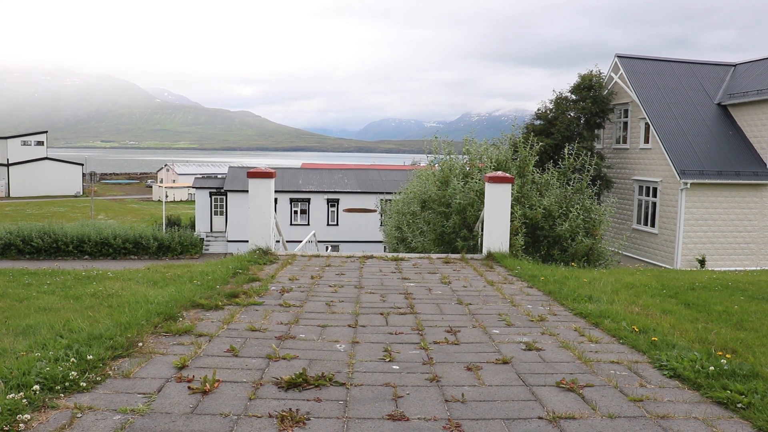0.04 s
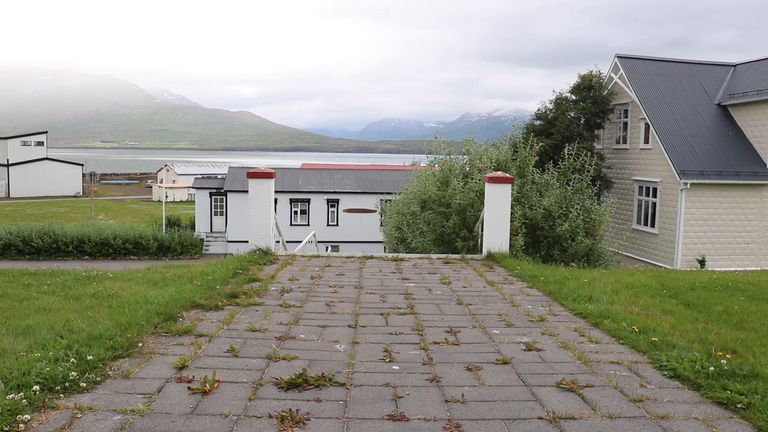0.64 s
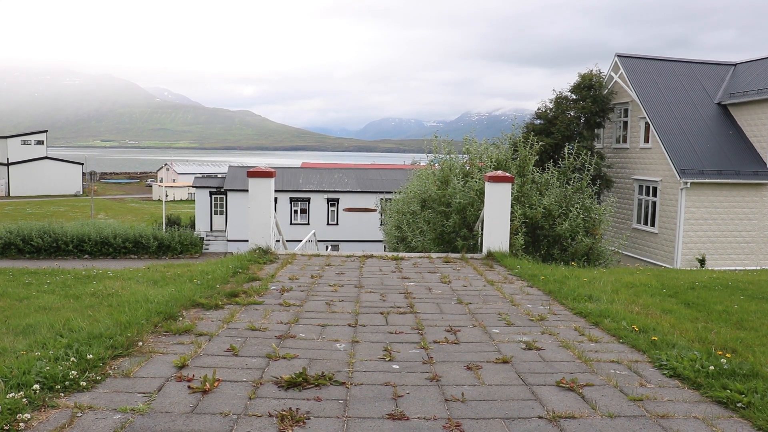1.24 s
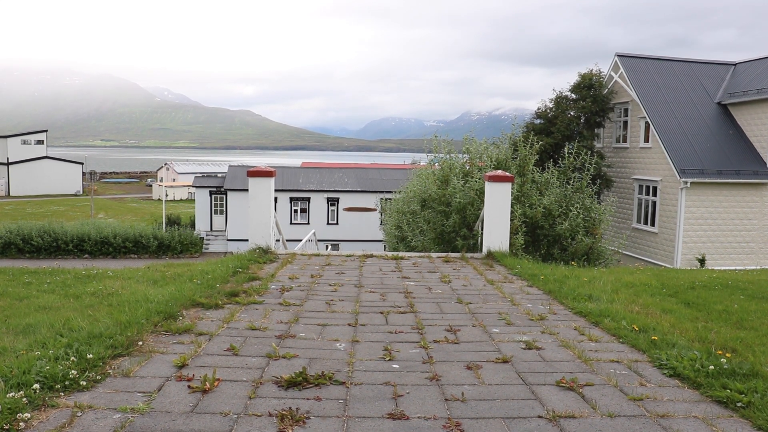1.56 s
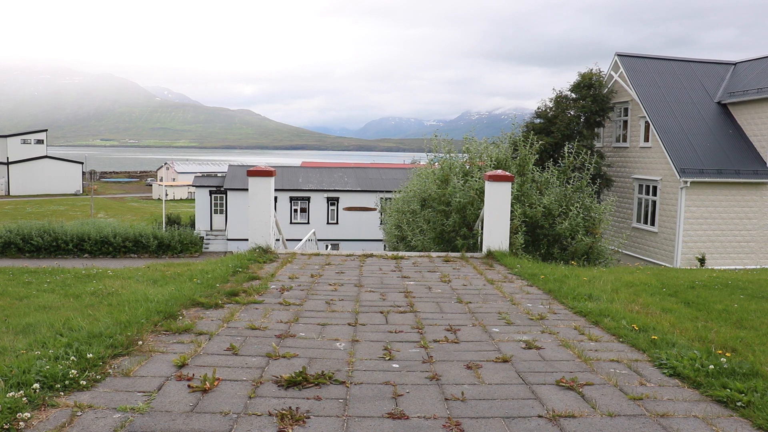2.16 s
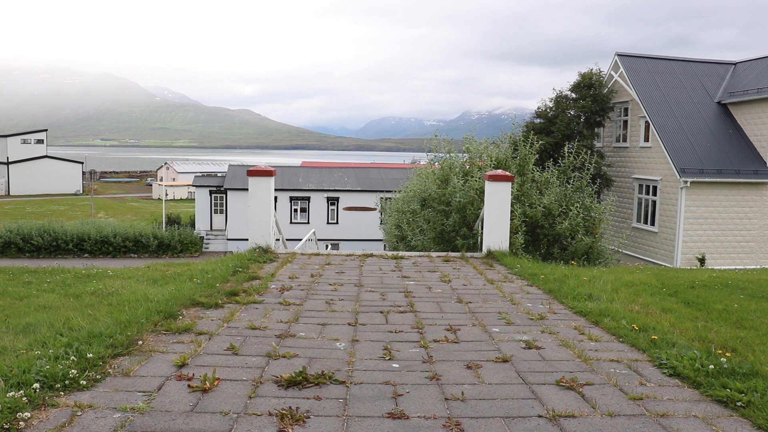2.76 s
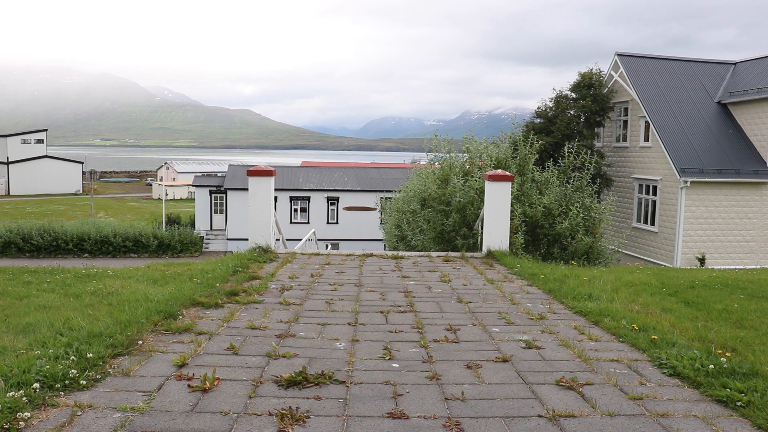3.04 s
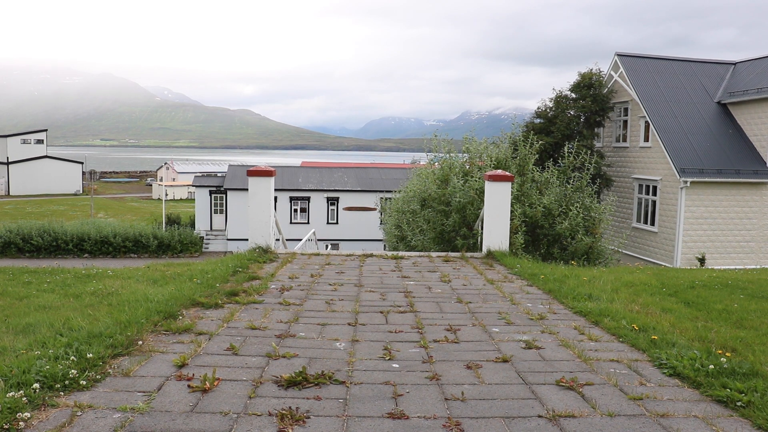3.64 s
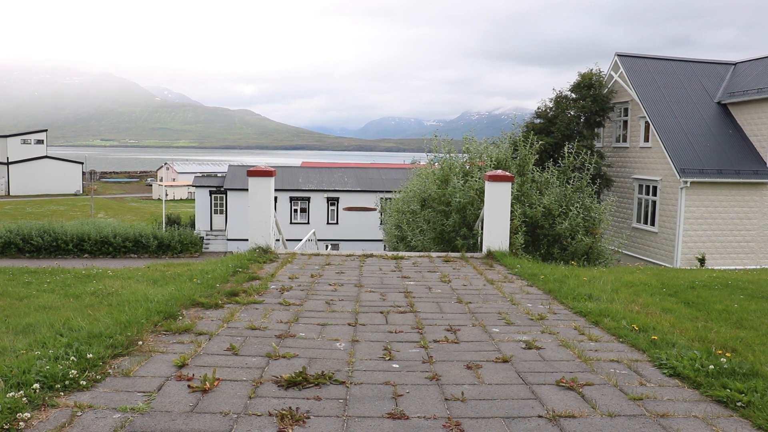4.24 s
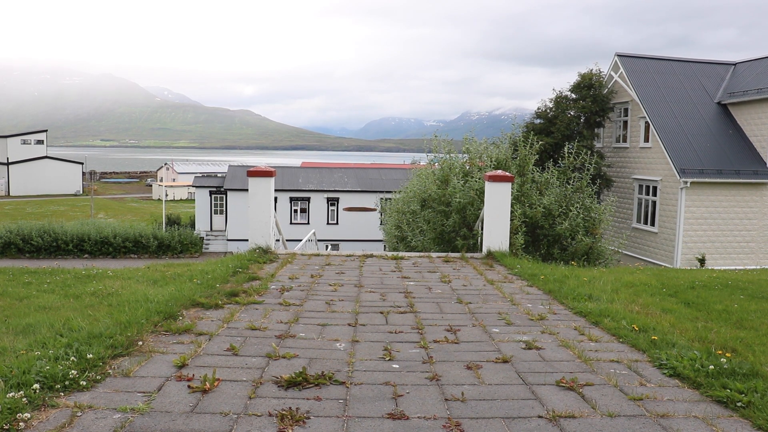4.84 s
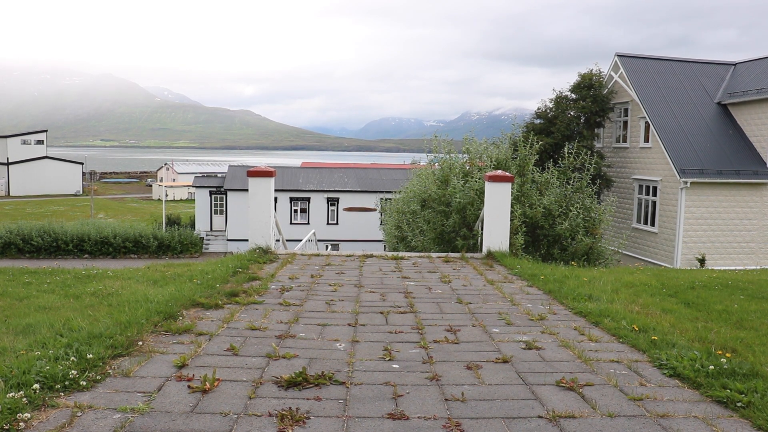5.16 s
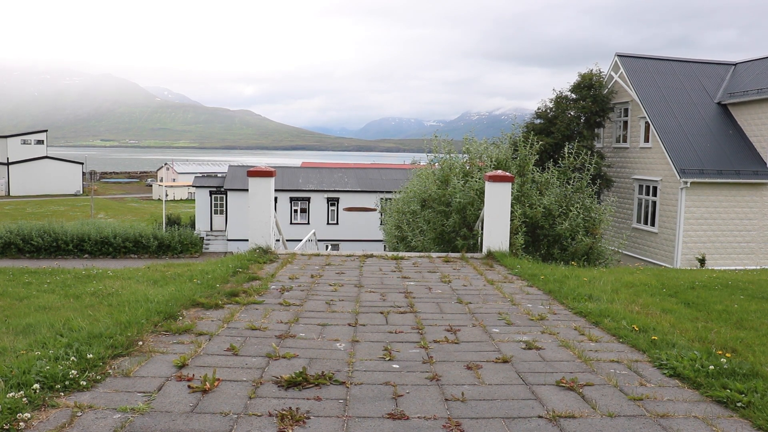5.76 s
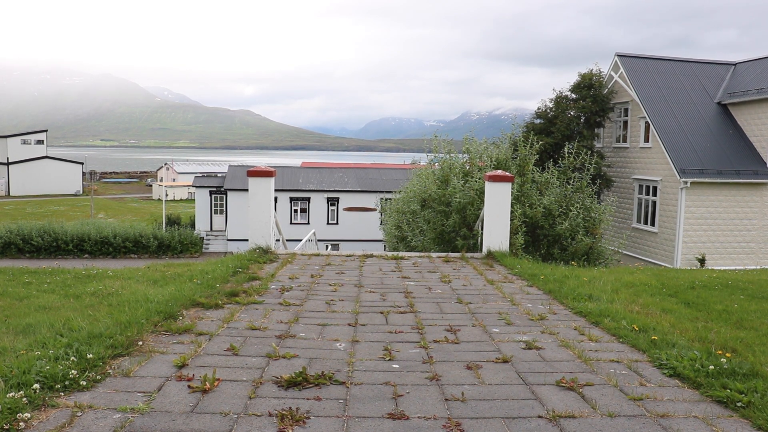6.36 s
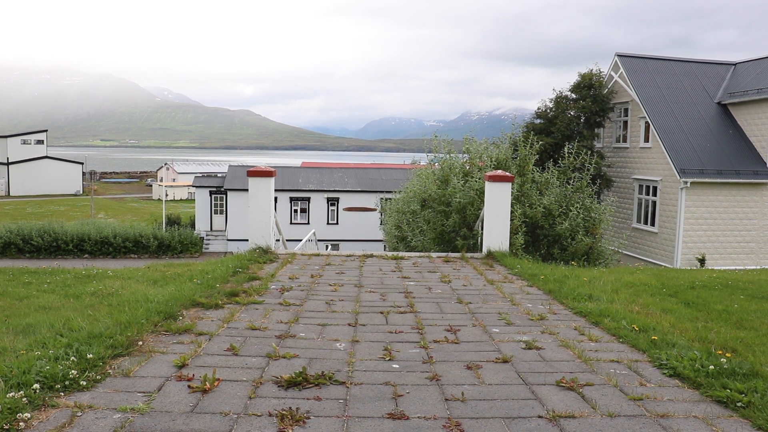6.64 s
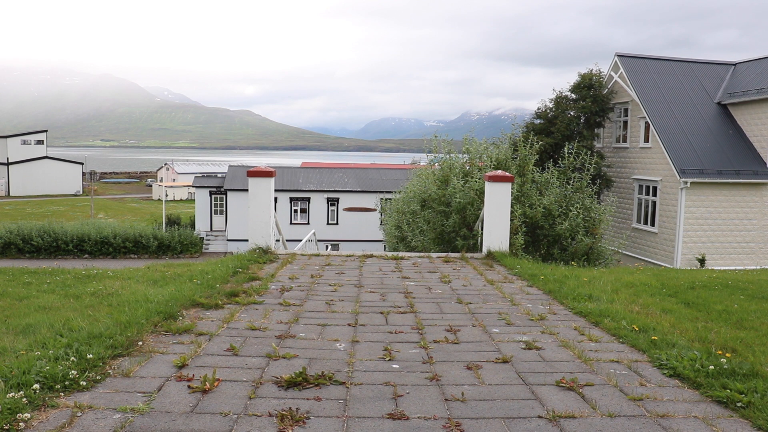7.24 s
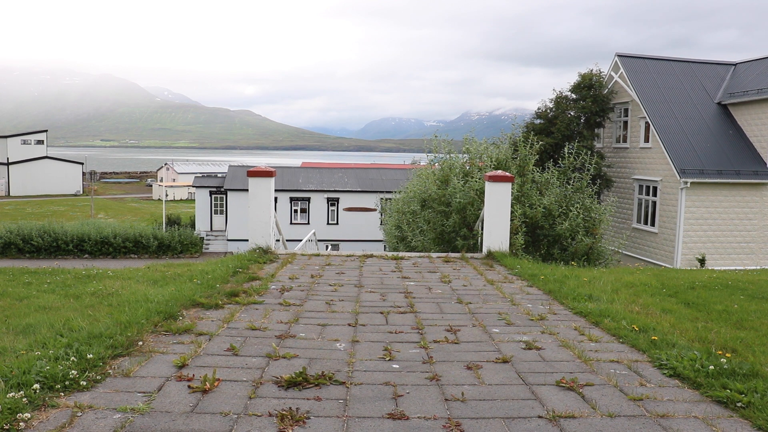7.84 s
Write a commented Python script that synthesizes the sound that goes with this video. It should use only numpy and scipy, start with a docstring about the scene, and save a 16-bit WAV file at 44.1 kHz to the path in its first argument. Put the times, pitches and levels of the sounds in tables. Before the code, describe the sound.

A single church bell rings outdoors, striking right at the start and swinging on in uneven pairs of blows. Each one is a sharp, bright clang with a soft thud beneath it, echoing in the belfry and leaving a long, wavering ring. On the last swing the clapper bounces and hits twice in quick succession. Faint wind rumble, hiss and a low hum lie behind it.

```python
"""A church bell rings out at once and swings on in uneven pairs of blows; on the last swing the clapper
bounces and hits twice. Each impact excites the bell's partials, close pairs that beat, and two short pings
bloom just after it. A clang reverberates in the belfry, and the jolted frame resonates with a thud.
Behind the bell lie a faint rumble of wind, a steady hiss and a low hum."""
import sys
import numpy as np
from scipy import signal
from scipy.fft import rfft, irfft, next_fast_len
from scipy.io import wavfile
from scipy.ndimage import map_coordinates

SR = 44100
rng = np.random.default_rng(int(sys.argv[2]) if len(sys.argv) > 2 else 0)


def inscribe(sig):
    """Save sig as 16-bit PCM at rate SR to the path in sys.argv[1].

    A 1-D sig is mono; a 2-D sig holds one channel per row.
    Samples are clipped to [-1, 1] before scaling.
    """
    pcm = np.round(np.clip(np.atleast_2d(sig).T, -1, 1) * 32767)
    wavfile.write(sys.argv[1], SR, pcm.astype(np.int16))


N = 352359

# Partials of the bell, plus two short pings (1457 and 2230 Hz) that bloom just after each blow;
# the spot struck (0-2) sets each level and the signed share of its twin:
# pitch_hz, spot0_db, spot1_db, spot2_db, twin0_ratio, twin1_ratio, twin2_ratio,
# t60_s, rise_s, beat_hz, dip_s (a beat minimum for a positive twin, a maximum for a negative one)
BELL_TONES = [(339, -46, -40, -51, 0.12, 0.12, 0.12, 9.7, 0.025, 1.53, 0.27),
              (444, -38.5, -42, -34, 0.68, -0.6, 0.55, 11.48, 0.025, 1.52, 0.07),
              (706.7, -28.5, -29, -32, 0.05, 0.05, 0.05, 12.0, 0.03, 1.39, 0.13),
              (856.8, -27, -26, -26, 0.12, 0.12, 0.12, 9.89, 0.025, 0.95, 0.03),
              (899, -28, -26, -28, 0.22, 0.25, 0.6, 7.48, 0.053, 3.53, 0.16),
              (1014, -35, -32, -32, 0.07, 0.07, 0.07, 7.29, 0.05, 0.9, 0.25),
              (1120.2, -22, -24, -22, 0.88, 0.85, -0.15, 5.51, 0.025, 1.47, 0.02),
              (1358, -37, -36, -39, 0.69, 0.85, 0.9, 3.25, 0.082, 1.81, 0.39),
              (1457, -9.5, -9.5, -20, 0, 0, 0, 0.25, 0.038, 1, 0),
              (1461, -24, -24, -24, 0.33, 0.4, -0.75, 3.69, 0.035, 4.35, 0.17),
              (1746, -30, -25, -35, 0.57, 0.5, -0.45, 2.06, 0.029, 3.97, 0.17),
              (1787, -22, -29, -37, 0.71, 0.71, 0.71, 0.64, 0.054, 5.1, 0.0),
              (1890, -19, -22, -29, 0.17, 0.3, -0.15, 1.7, 0.1, 4.42, 0.05),
              (1927.4, -11, -11, -13.5, 0.24, 0.2, 0.55, 1.72, 0.141, 1.4, 0.57),
              (2071, -16, -18, -33, 0.25, 0.25, 0.25, 0.58, 0.13, 4.73, 0.01),
              (2209, -21.5, -21.5, -25, 0.27, 0.15, 0.25, 2.9, 0.081, 2.23, 0.24),
              (2230, -15, -15, -20, 0, 0, 0, 0.35, 0.08, 1, 0),
              (2380, -14, -15, -13, 0.09, 0.09, 0.09, 0.81, 0.141, 4.6, 0.01),
              (2618, -27, -30, -28, 0.47, 0.47, 0.47, 0.66, 0.048, 2.92, 0.16),
              (2795, -24, -26, -23, 0.71, 0.71, 0.71, 0.57, 0.049, 0.9, 0.33),
              (2839, -36, -34, -34, 0.77, 0.77, 0.77, 1.31, 0.043, 6.18, 0.16),
              (2919.5, -28, -34, -23, 0.18, 0.45, 0.1, 2.6, 0.056, 9.27, 0.09),
              (3005, -16, -18, -17, 0.84, 0.84, 0.84, 0.64, 0.102, 1.08, 0.09),
              (3038, -19, -18, -24, 0.14, 0.14, 0.14, 1.33, 0.094, 0.9, 0.36),
              (3067.5, -30, -20, -31, 0.27, 0.5, 0.55, 2.38, 0.041, 1.39, 0.59),
              (3164, -34, -32, -37, 0.54, 0.85, 0.55, 1.55, 0.07, 2.42, 0.27),
              (3407, -51, -45, -46, 0.32, 0.32, 0.32, 1.81, 0.054, 3.6, 0.27),
              (3520, -38, -36, -34, 0.76, 0.76, 0.76, 0.83, 0.025, 0.9, 0.1),
              (3624, -28, -26, -32, 0.15, 0.15, 0.15, 0.71, 0.022, 2.92, 0.15),
              (3823, -40, -34, -48, 0.32, 0.32, 0.32, 1.4, 0.085, 2.66, 0.05),
              (4019, -32, -21, -31, 0.55, 0.15, 0.6, 2.13, 0.025, 3.42, 0.08),
              (4052, -27, -35, -26, 0.09, -0.2, 0.3, 1.74, 0.053, 2.07, 0.37),
              (4183, -45, -45, -45, 0.3, 0.3, 0.3, 1.44, 0.069, 3.66, 0.24),
              (4280, -53, -53, -45, 0.19, 0.19, 0.19, 1.73, 0.044, 4.92, 0.03),
              (4624, -52, -45, -53, 0.44, 0.44, 0.44, 1.89, 0.029, 0.9, 0.43),
              (4725, -43, -42, -45, 0.44, 0.44, 0.44, 1.32, 0.067, 6.44, 0.1),
              (4877, -45, -46, -51, 0.08, 0.08, 0.08, 1.52, 0.088, 3.59, 0.11),
              (5041, -30, -25, -39, 0.35, 0.35, 0.35, 0.88, 0.022, 1.65, 0.45),
              (5295, -44, -42, -35, 0.14, 0.8, 0.55, 1.83, 0.04, 11.62, 0.01),
              (5529, -41, -37, -41, 0.22, 0.22, 0.22, 0.73, 0.054, 3.97, 0.1),
              (5852, -52, -47, -49, 0.55, 0.55, 0.55, 1.14, 0.099, 4.73, 0.13),
              (6108, -32, -37, -39, 0.27, 0.25, -0.3, 1.69, 0.022, 5.93, 0.14),
              (6632, -50, -44, -42, 0.2, 0.2, 0.2, 1.19, 0.04, 2.86, 0.35),
              (7222, -42, -39, -46, 0.7, 0.7, 0.5, 1.48, 0.052, 13.47, 0.0),
              (8010, -44, -43, -39, 0.19, 0.19, 0.19, 0.88, 0.068, 5.51, 0.08),
              (8355, -39, -35, -50, 0.3, 0.3, 0.2, 1.16, 0.102, 3.54, 0.1),
              (8972, -54, -48, -58, 0.66, 0.66, 0.66, 1.07, 0.056, 0.9, 0.48),
              (9502, -42, -38, -46, 0.35, 0.35, 0.35, 1.04, 0.055, 3.25, 0.1),
              (10175, -59, -47, -59, 0.41, 0.41, 0.41, 1.24, 0.03, 8.46, 0.1),
              (10621, -48, -47, -49, 0.17, 0.17, 0.17, 1.05, 0.065, 2.3, 0.26),
              (10909, -51, -52, -60, 0.48, 0.48, 0.48, 1.08, 0.074, 0.9, 0.54),
              (11775, -53, -42, -44, 0.63, 0.63, 0.63, 0.62, 0.087, 3.42, 0.15),
              (12518, -60, -48, -54, 0.69, 0.69, 0.69, 0.61, 0.081, 3.24, 0.11)]
# Impacts of the clapper: start_s, spot_index, ring_db, clang_db, thud_db
CLAPPER_BLOWS = [(-2.12, 0, -0.5, -20, -20), (-0.006, 1, -0.2, 0.5, 4), (1.493, 0, 0.3, 0.5, 3),
                 (3.615, 0, 0.2, 0, 1), (5.111, 0, 0, -0.5, 1), (6.993, 0, -0.7, -1.2, 5),
                 (7.108, 2, 0, -2.2, 2)]
# Direct sound relative to the reverberant ring, for spots 0-2: level_db
DIRECT_BY_SPOT = [-20, -20, -7]
# Spectral envelope of the weak high partials: pitch_hz, level_db
SHIMMER_SPECTRUM = [(1500, -46), (2200, -42), (3400, -49), (5000, -50), (8000, -58), (12000, -63),
                    (13500, -74)]
# Spectral shape of the clang: frequency_hz, relative_db
CLANG_SPECTRUM = [(120, -21), (300, -12), (520, -12), (750, -2), (1120, 0), (1350, -5), (1750, -1),
                  (2250, 0), (2550, -8), (2900, -2), (3400, -15), (5000, -19), (8000, -28), (15000, -49)]
# Decay times of the clang: frequency_hz, t60_s
CLANG_DECAY = [(200, .7), (1000, .36), (2000, .55), (3000, .58), (5000, .5), (13000, .38)]
# Resonances of the bell frame: centre_hz, width_hz, level_db, rise_s, t60_s
FRAME_MODES = [(68, 24, -40, .08, .8), (125, 35, -45, .05, .55), (198, 55, -38, .01, .22)]
# Steady background hiss, its top treble rolled off above about 11 kHz: frequency_hz, relative_db
HISS_SPECTRUM = [(10, -3), (25, 0), (60, -5), (130, -10), (250, -13), (500, -18), (1000, -25), (2000, -38),
                 (4000, -45), (10500, -46.5), (11800, -58), (15500, -68)]
# Spectral shape of the wind's rumble: frequency_hz, relative_db
WIND_SPECTRUM = [(8, -6), (25, 0), (55, -4), (120, -18), (400, -60), (1000, -120)]
# Tones of the distant hum: pitch_hz, rms_db
HUM_TONES = [(66, -60), (99, -58), (167, -64)]


def bell_ring(scatter_db=.5, handover_s=.025, flutter_db=1.1, drift_cycles=.045, settle_s=1.3):
    """Beating: each blow starts close pairs of partials and two pings; the clapper damps the old ring."""
    out = np.zeros(N)
    sway = (wobble(7) + .3 * wobble(50)).astype(np.float32)  # slow waver plus a quick shiver
    ends = [blow[0] for blow in CLAPPER_BLOWS[1:]] + [N / SR]
    for (start, spot, ring_db, _, _), end in zip(CLAPPER_BLOWS, ends):
        spot = round(spot)
        span = np.arange(int((end - start + .15) * SR), dtype=np.float32) / SR
        ring = np.zeros(len(span))
        unsettled = 1 + 1.2 * fade(span, settle_s)  # the first echoes interfere most
        for hz, db0, db1, db2, twin0, twin1, twin2, t60, rise, beat_hz, dip_s in BELL_TONES:
            db, twin = [(db0, twin0), (db1, twin1), (db2, twin2)][spot]
            t = span[:int(2 * t60 * SR)]
            # the swinging bell shifts its echoes, so level and phase waver, high partials most
            depth = (hz / 3000) ** .5  # scales flutter_db and drift_cycles
            level_sway, phase_sway = (depth * sway[k:k + len(t)] for k in rng.integers(N // 2, size=2))
            phase = 2 * np.pi * (hz * t + rng.random() + drift_cycles * phase_sway)
            pair = np.sin(phase) - twin * np.sin(phase + 2 * np.pi * beat_hz * (t - dip_s))
            flutter = flutter_db * unsettled[:len(t)] * level_sway
            gain = amp(db + scatter_db * rng.standard_normal() + flutter)
            ring[:len(t)] += gain * arrival(t, rise, DIRECT_BY_SPOT[spot]) * fade(t, t60) * pair
        damping = 1 - swell(np.maximum(span - (end - start), 0), handover_s)
        add(out, start, amp(ring_db) * ring * damping)
    return out


def bell_shimmer(count=110, low_hz=1700, high_hz=13200, t60_s=.85, rise_s=.045):
    """Superposition: many weak high partials merge into a shimmer that dies soon after each blow."""
    out, t = np.zeros(N), np.arange(SR) / SR
    pitches = low_hz + (high_hz - low_hz) * (np.arange(count) + rng.random(count)) / count
    waves = np.sin(2 * np.pi * (pitches[:, None] * t + rng.random((count, 1))))
    for start, _, _, clang_db, _ in CLAPPER_BLOWS:
        gains = amp(along(SHIMMER_SPECTRUM, pitches) + clang_db) * rng.standard_normal(count)
        add(out, start, gains @ waves * swell(t, rise_s) * fade(t, t60_s))
    return out


def clapper_clang(gain_db=-15, rise_s=.036, direct_db=-15):
    """Impact excitation: a broadband crash, crowded about the partials, reverberates in the belfry."""
    out, t = np.zeros(N), np.arange(SR) / SR
    colour = lambda hz: amp(along(CLANG_SPECTRUM, hz)) * near_tones(hz)
    envelope = arrival(t, rise_s, direct_db)
    for start, _, _, clang_db, _ in CLAPPER_BLOWS:
        add(out, start, amp(gain_db + clang_db) * envelope * burst(colour, CLANG_DECAY))
    return out


def frame_thud(lead_s=.016):
    """Damped resonance: the swing jolts the frame just before each blow; it knocks, then booms."""
    out, t = np.zeros(N), np.arange(SR) / SR
    for start, _, _, _, thud_db in CLAPPER_BLOWS:
        for centre_hz, width_hz, db, rise, t60 in FRAME_MODES:
            wood = noise(SR, lambda hz: resonance(hz - centre_hz, width_hz / 2))
            add(out, start - lead_s, amp(db + thud_db) * swell(t, rise) * fade(t, t60) * wood)
    return out


def background(hiss_db=-51, wind_db=-54.2, gust_db=1.2, eddy_db=2.4, waver_db=2.5, drift_cycles=.25):
    """Random modulation: slow gusts and quick eddies vary the wind over steady hiss; a far hum wavers."""
    wind_gain = amp(wind_db + gust_db * wobble(2.5) + eddy_db * wobble(7))
    wind = wind_gain * noise(N, lambda hz: amp(along(WIND_SPECTRUM, hz)))
    hum = np.zeros(N)
    for pitch_hz, db in HUM_TONES:
        peak = np.sqrt(2) * amp(db + waver_db * wobble(2))
        hum += peak * np.sin(2 * np.pi * (pitch_hz * np.arange(N) / SR + drift_cycles * wobble(4)))
    hiss = amp(hiss_db) * noise(N, lambda hz: amp(along(HISS_SPECTRUM, hz)))
    return hiss + wind + hum


def arrival(t, rise_s, direct_db, direct_rise_s=.006):
    """Reverberant build-up: some sound comes straight, the rest gathers between the belfry walls."""
    reverberant = swell(t, rise_s)
    return reverberant + amp(direct_db) * swell(t, direct_rise_s) * (1 - reverberant)


def near_tones(hz, half_width_hz=30, gap_db=-12):
    """Resonant filtering: the gain peaks at every partial and ping, sinking towards gap_db between."""
    offset_hz = np.min(np.abs(hz[:, None] - np.array(BELL_TONES)[:, 0]), axis=1)
    return np.hypot(amp(gap_db), resonance(offset_hz, half_width_hz))


def resonance(offset_hz, half_width_hz):
    """Resonance curve: gain 1 at the centre, one half at half_width_hz to either side."""
    return 1 / (1 + (offset_hz / half_width_hz) ** 2)


def burst(colour, decay_times):
    """Frequency-dependent damping: one second of coloured noise, each band dying at its own rate."""
    hz, t, bands = signal.stft(noise(SR, colour), SR, nperseg=512)
    decay = fade(t, along(decay_times, hz)[:, None])
    return signal.istft(bands * decay, SR, nperseg=512)[1][:SR]


def noise(length, response):
    """Spectral shaping: white noise times a frequency response, scaled to rms 1."""
    size = next_fast_len(length + 8192)
    white = rfft(rng.standard_normal(length), size)
    shaped = irfft(white * response(np.fft.rfftfreq(size, 1 / SR)), size)[:length]
    return shaped / np.sqrt(np.mean(shaped ** 2) + 1e-20)


def fade(t, t60_s):
    """Exponential decay: 60 dB in t60_s."""
    return np.exp(-np.log(1000) * t / np.maximum(t60_s, .01))


def swell(t, rise_s):
    """Onset transient: a smooth rise from 0 to 1."""
    return 1 - np.exp(-(t / rise_s) ** 2)


def wobble(rate_hz):
    """Spline interpolation: a smooth curve through rate_hz random values a second."""
    knots = rng.standard_normal(int(N * rate_hz / SR) + 4)
    return map_coordinates(knots, [np.arange(N) * rate_hz / SR])


def along(points, hz):
    """Interpolation of (frequency_hz, value) points on a logarithmic frequency axis."""
    frequencies, values = np.transpose(points)
    return np.interp(np.log(hz + 1), np.log(frequencies + 1), values)


def amp(db):
    """The decibel law: level to amplitude ratio."""
    return np.exp(np.asarray(db) * np.log(10) / 20)


def add(track, start_s, sound):
    """Superposition: sound joins track at start_s, which may be negative."""
    start = round(start_s * SR)
    part = sound[max(-start, 0):max(N - start, 0)]
    track[max(start, 0):][:len(part)] += part


def scene():
    """Superposition: the bell and its frame sum with the quiet background in one channel."""
    return (bell_ring() + bell_shimmer() + clapper_clang() + frame_thud() + background())[None]


def record(dry):
    """Band limiting: a steep low-pass removes the treble above 15400 Hz."""
    return signal.sosfilt(signal.ellip(10, .1, 90, 15400, fs=SR, output="sos"), dry)


dry = scene()
out = record(dry)
inscribe(out)
```